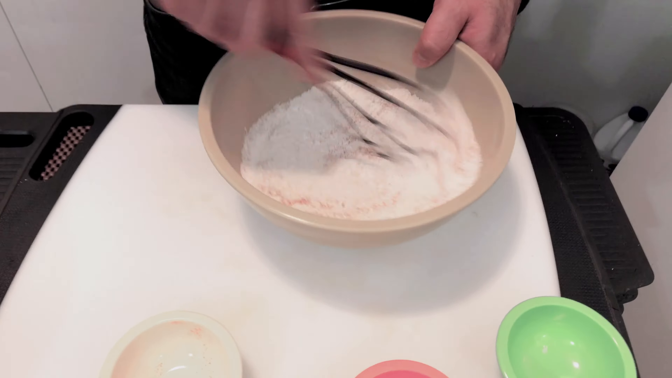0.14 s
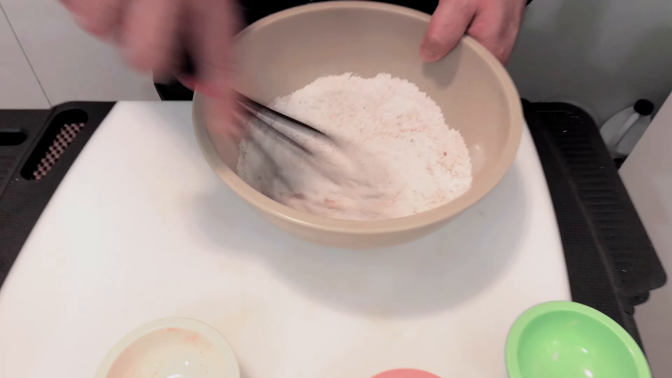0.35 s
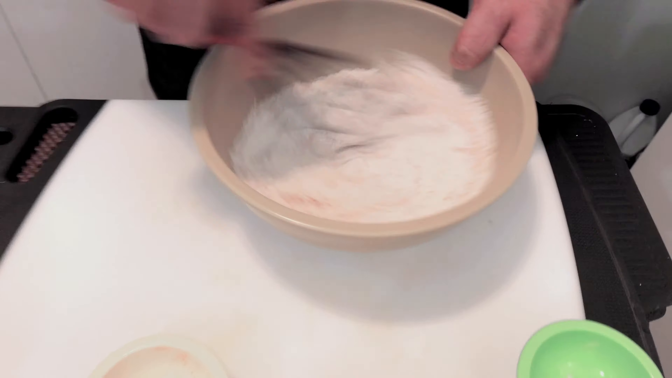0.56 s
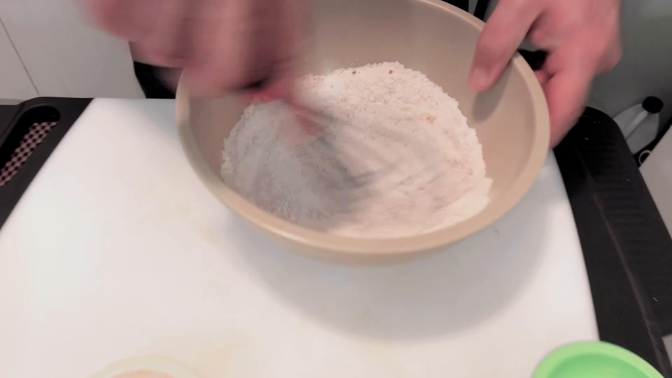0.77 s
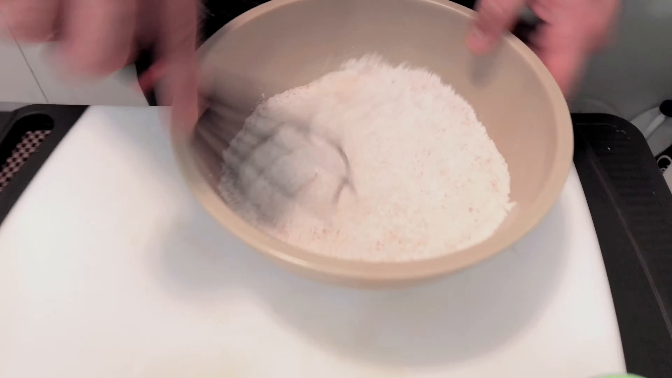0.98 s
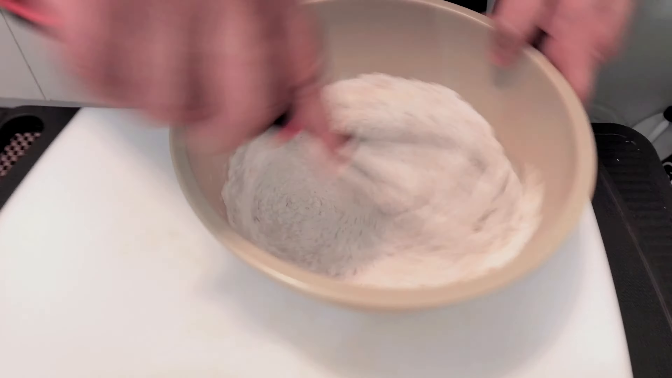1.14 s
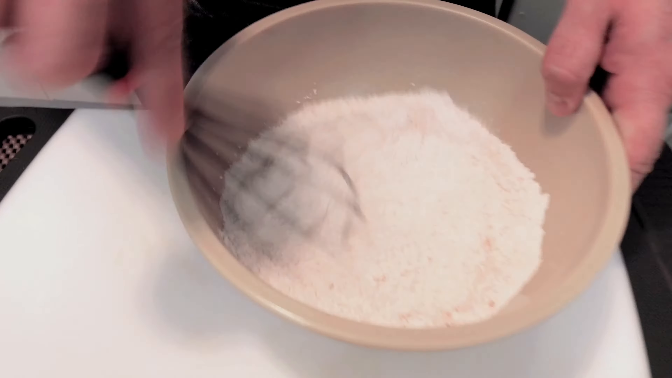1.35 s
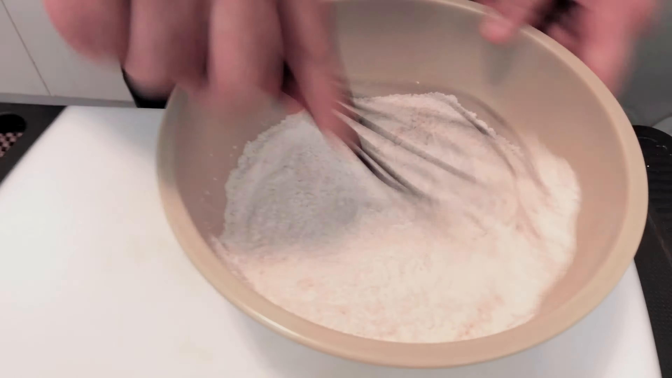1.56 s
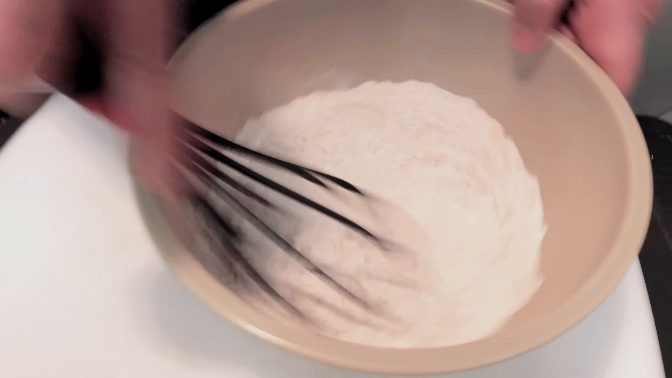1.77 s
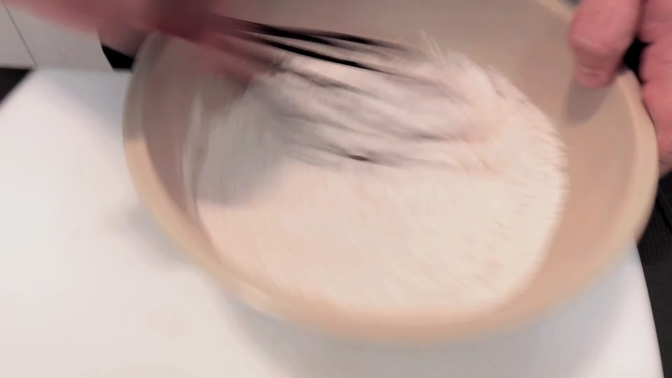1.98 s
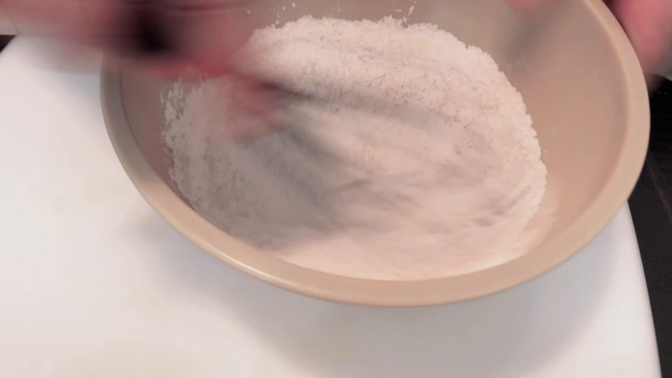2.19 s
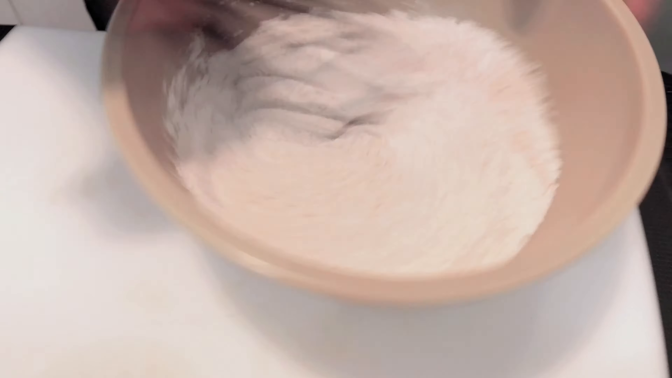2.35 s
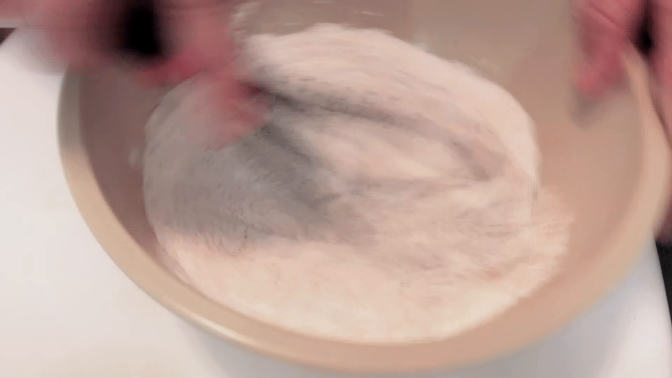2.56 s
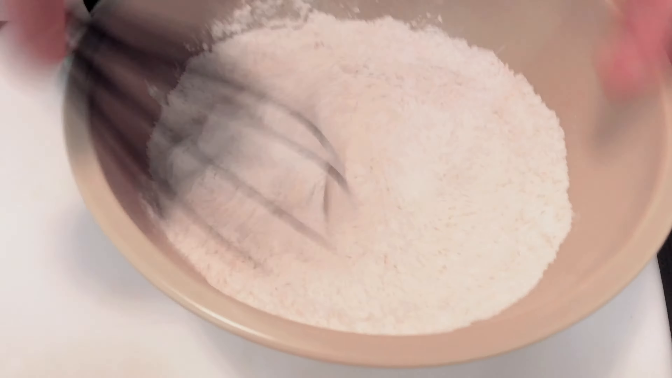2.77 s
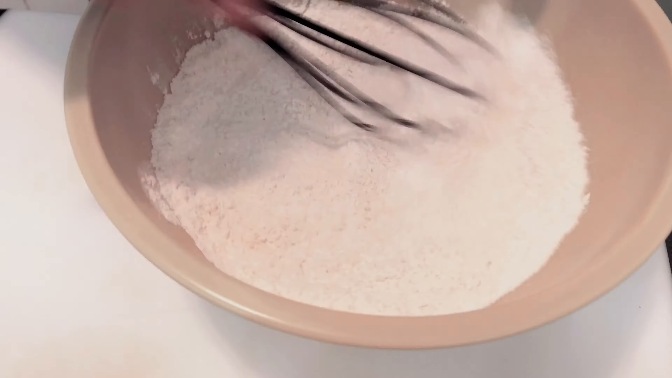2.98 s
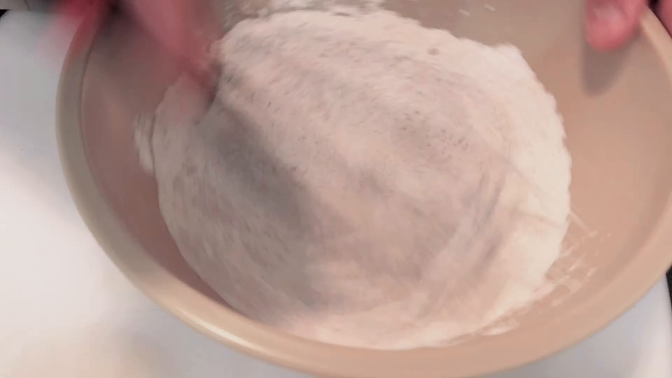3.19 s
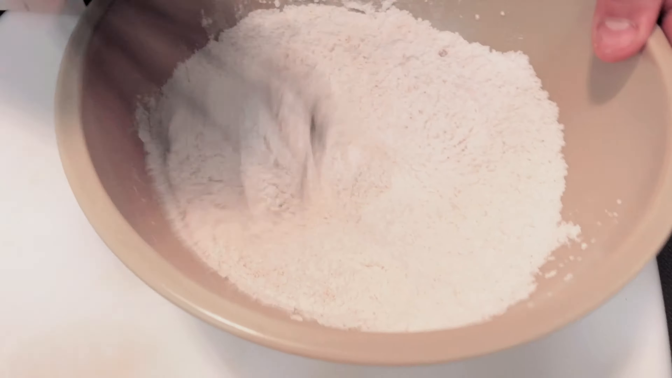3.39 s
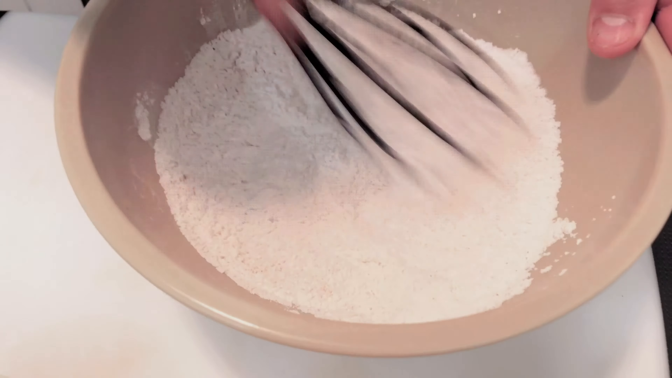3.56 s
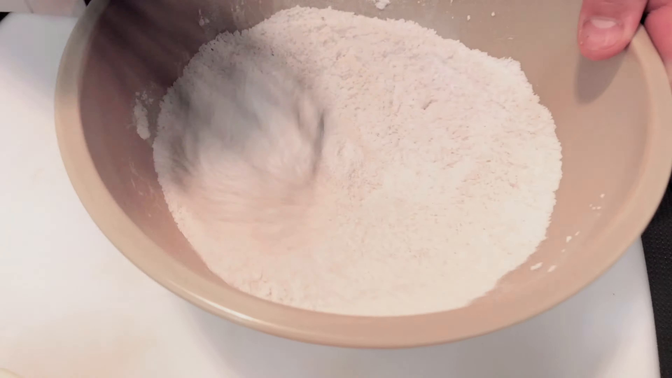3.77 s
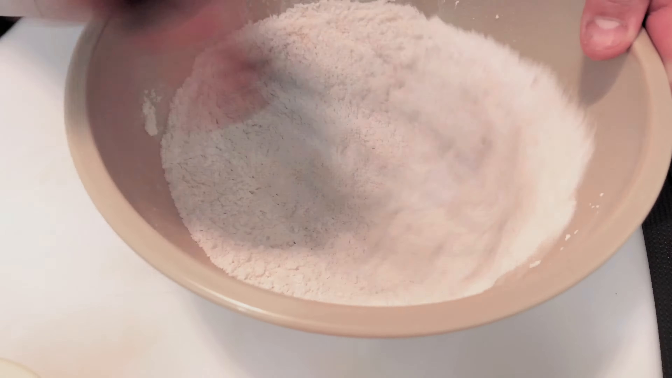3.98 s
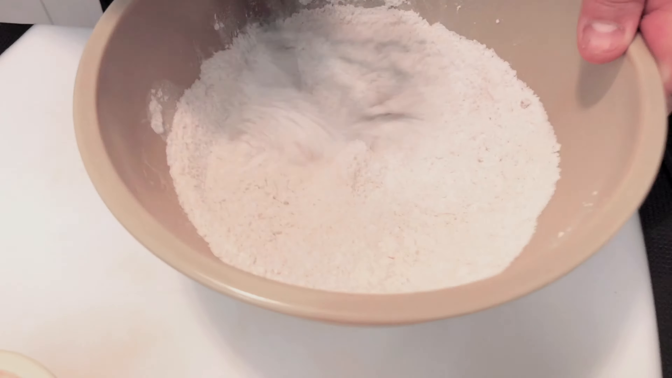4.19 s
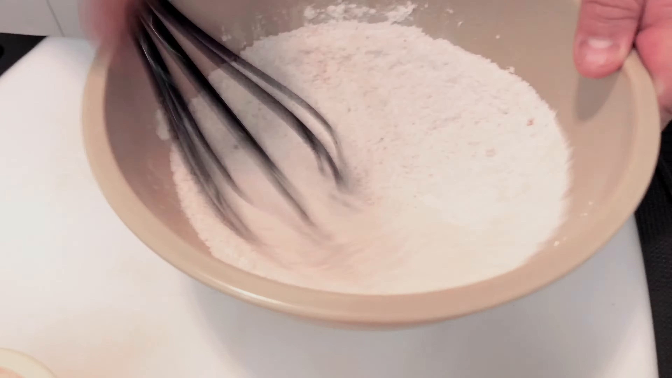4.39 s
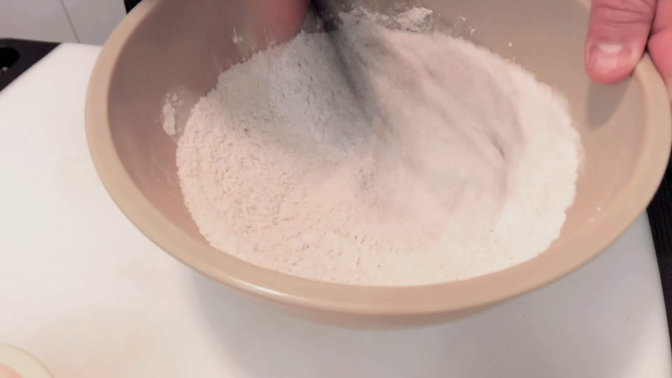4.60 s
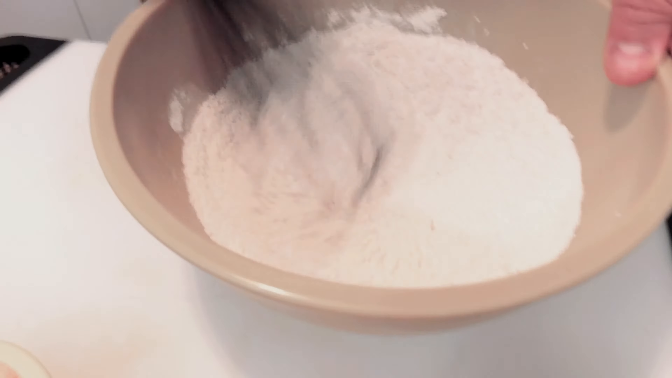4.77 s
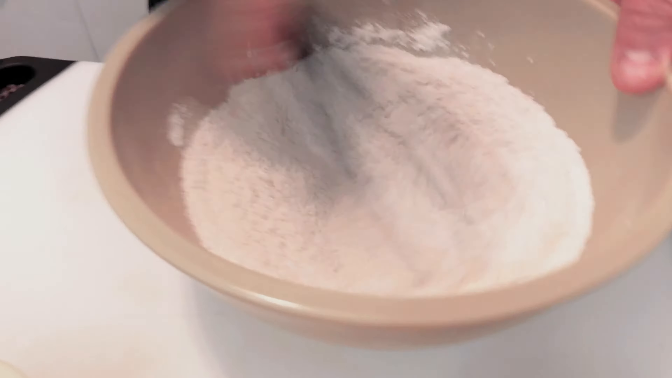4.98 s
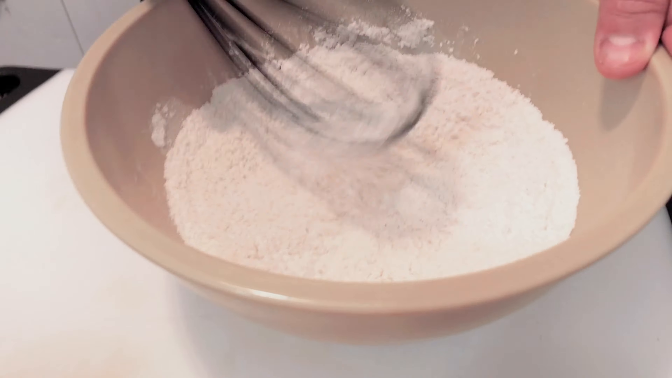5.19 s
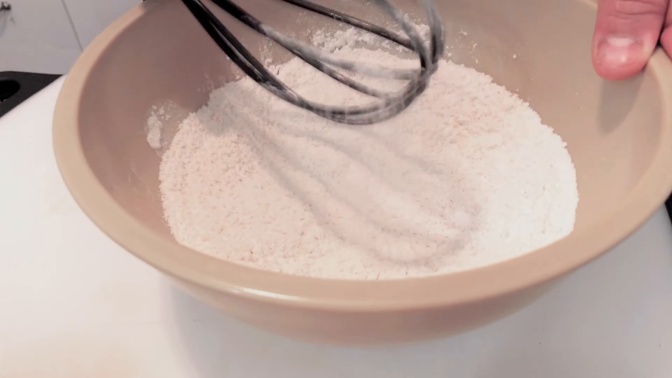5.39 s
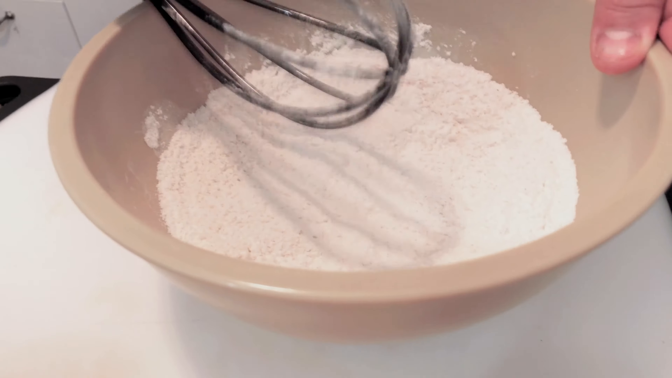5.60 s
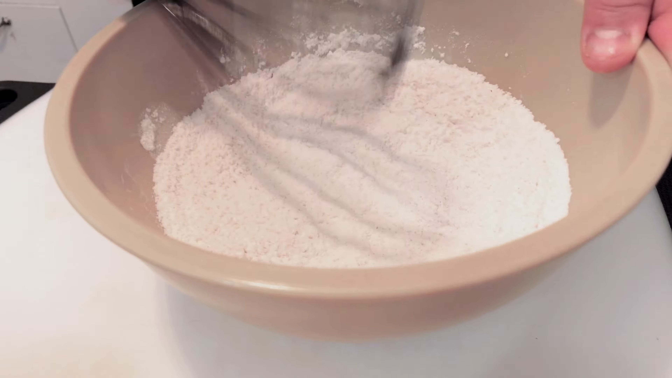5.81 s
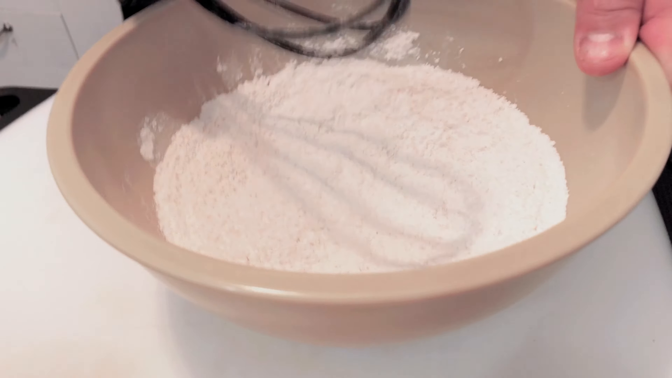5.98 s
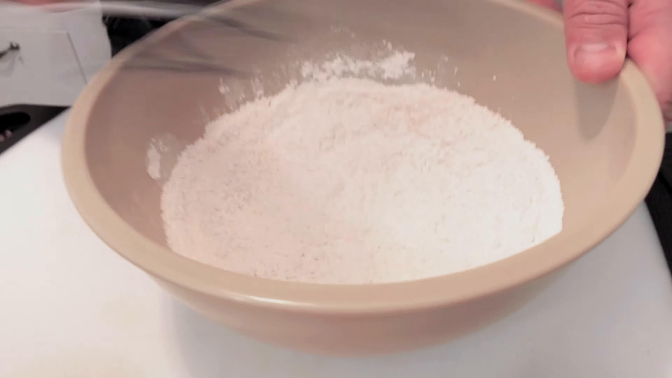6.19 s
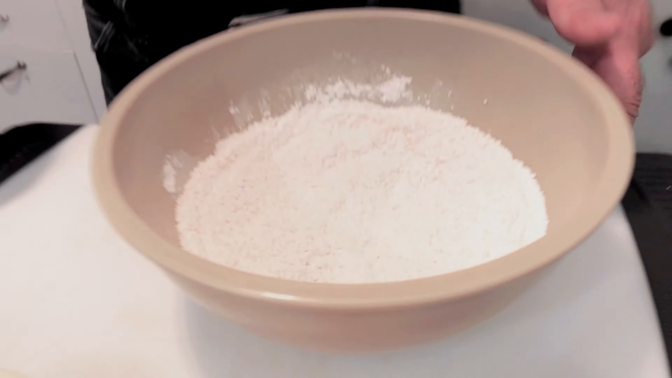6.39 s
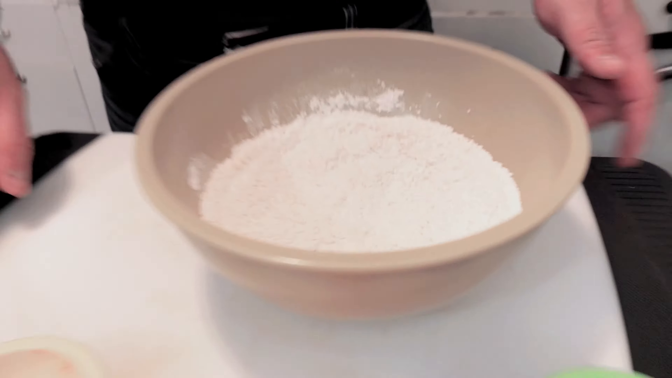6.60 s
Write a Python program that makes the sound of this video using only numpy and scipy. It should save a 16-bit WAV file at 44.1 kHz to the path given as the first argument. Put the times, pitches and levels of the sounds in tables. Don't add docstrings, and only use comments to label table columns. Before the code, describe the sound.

A wire whisk stirs flour in a plastic bowl with quick scratchy swishes, then taps the rim five times and is set down with a knock.

```python
import sys
import numpy as np
from scipy import signal
from scipy.fft import rfft, irfft, next_fast_len
from scipy.io import wavfile
from scipy.ndimage import uniform_filter1d, map_coordinates

SR = 44100
rng = np.random.default_rng(int(sys.argv[2]) if len(sys.argv) > 2 else 0)


def rack_gain(trim_db):
    fader = np.asarray(trim_db, float)
    return 10 ** (fader / 20)


def output_pcm(signal):
    pcm = np.clip(np.atleast_2d(signal).T, -1, 1) * 32767
    wavfile.write(sys.argv[1], SR, np.round(pcm).astype(np.int16))


N = 293265


def unit(x):
    return x / np.sqrt(np.mean(x ** 2) + 1e-20)


def along(points, hz):
    f, v = np.transpose(points)
    return np.interp(np.log(hz + 1), np.log(f + 1), v)


def wobble(rate):
    knots = rng.standard_normal(int(N * rate / SR) + 4)
    return map_coordinates(knots, [np.arange(N) * rate / SR], order=1)


def filtered(x, response):
    m = next_fast_len(N + SR // 2)
    return irfft(rfft(x, m) * response(np.fft.rfftfreq(m, 1 / SR)), m)[..., :N]


def resonance(f, hz, width):
    return 1j * f * width / (hz * hz - f * f + 1j * f * width)


def coloured(x, spectrum):
    return unit(filtered(x, lambda f: rack_gain(along(spectrum, f))))


def dull(t, lo_hz, hi_hz):
    band = signal.butter(2, [lo_hz, hi_hz], "band", fs=SR, output="sos")
    return unit(signal.sosfilt(band, rng.standard_normal(len(t))))


def ringing(modes, t, scatter_db):
    out = 0
    for hz, db, t60 in modes:
        level = db + rng.normal(0, scatter_db)
        out = out + rack_gain(level - 60 * t / t60) * np.sin(2 * np.pi * hz * t)
    return out


def add(track, s, sound):
    part = track[round(s * SR):][:len(sound)]
    part += sound[:len(part)]


def swells(rows):
    t, power = np.arange(N) / SR, np.full(N, 1e-12)
    for s, db, rise, fall in rows:
        near = slice(max(round((s - 4 * rise) * SR), 0), round((s + 4 * fall) * SR))
        width = np.where(t[near] < s, rise, fall)
        power[near] += rack_gain(2 * db) * np.exp(-((t[near] - s) / width) ** 2)
    return power


# (frequency [Hz], level [dB])
AIR_SPECTRUM = [(15, -26), (25, 4), (124, -10), (163, -17), (238, -16), (902, -28), (1060, -26),
                (10400, -36), (15700, -38), (15900, -80)]


def room_air():
    air_db = -57.5
    return rack_gain(air_db) * coloured(rng.standard_normal(N), AIR_SPECTRUM)


# (frequency [Hz], t60 [s])
KITCHEN_T60 = [(200, 0.94), (2000, 0.42), (10000, 0.21)]


def kitchen(x):
    hz, t, z = signal.stft(rng.standard_normal(SR // 2), SR, nperseg=256)
    decay = rack_gain(-60 * t / along(KITCHEN_T60, hz)[:, None])
    tail = signal.istft(z * decay, SR, nperseg=256)[1]
    return signal.fftconvolve(np.pad(x, (200, 0)), tail / np.linalg.norm(tail))[:N]


# (frequency [Hz], level [dB])
ROCK_SPECTRUM = [(41, -28), (70, 7.5), (134, 0.5), (265, 3), (329, -1), (357, -18.5), (500, -27.5),
                 (650, -48), (1100, -120)]
# (time [s], level [dB])
HAND_JOLTS = [(0.172, -51), (0.918, -49), (1.127, -48), (1.247, -48), (1.731, -43.5), (1.861, -33.5),
              (2.128, -46.5), (2.287, -43.5), (2.434, -42.5), (2.534, -39), (3.046, -43), (3.639, -47.5),
              (4.031, -43.5), (4.343, -47.5)]
# (time [s], peak level [dB], pitch [Hz])
BOWL_KNOCKS = [(0.272, -41, 1000), (2.095, -36, 241), (.9, -41, 101), (1.0, -44, 150), (1.42, -37, 200),
               (2.397, -33.5, 333), (3.989, -37, 130), (4.128, -43, 132), (4.485, -39, 130),
               (4.815, -38.5, 127), (5.714, -33, 200), (5.902, -29, 200), (6.121, -33, 210),
               (2.791, -39, 202), (0.523, -29.5, 282), (0.885, -23.5, 1200), (1.075, -37, 154),
               (1.216, -35, 263), (1.387, -35.5, 242), (1.594, -34.5, 97), (1.705, -32.5, 1300),
               (1.812, -30, 150), (1.935, -28.5, 278), (2.243, -22.5, 975), (2.496, -28, 78),
               (2.658, -27.5, 180), (3.24, -24, 229), (3.895, -36, 1200), (3.985, -28.5, 640),
               (4.277, -38, 222), (4.53, -32, 148), (4.806, -38, 1270), (5.317, -30.5, 243),
               (5.714, -34.5, 87), (5.902, -22.5, 79.5), (6.122, -27.5, 80.7), (5.902, -27, 654),
               (6.121, -37, 690)]


def worktop():
    boom_db, rock_db, rock_knock_db, rock_t60 = -59, -62.5, -15, 0.19
    jolt_s, jolt_hz = 0.029, 46.6
    knock_cycles = 8.9
    stirring = uniform_filter1d(1. * (np.arange(N) < STROKES[-1][1] * SR), size=4000)
    boom = unit(filtered(rng.standard_normal(N), lambda f: resonance(f, 45, 24) ** 2))
    jolts = np.sqrt(2 * swells([(s, db, 0.63 * jolt_s, jolt_s) for s, db in HAND_JOLTS]))
    jolt_phase = 2 * np.pi * np.cumsum(jolt_hz + 3.24 * wobble(8)) / SR
    out = rack_gain(boom_db) * stirring * boom + jolts * np.sin(jolt_phase)
    sway = rack_gain(rock_db) * stirring
    rock = coloured(rng.standard_normal(N) * rack_gain(np.clip(3 * wobble(40), -6, 4)), ROCK_SPECTRUM)
    t = np.arange(SR // 4) / SR
    plate = [(180, -11.5, .04), (270, -10.5, .05), (370, -13, .03), (720, -10, .02), (1100, -12, .02)]
    for s, db, hz in BOWL_KNOCKS:
        thud = ringing([(hz, 0, max(knock_cycles / hz, .018))] + plate, t, scatter_db=2.0)
        thud = thud + rack_gain(-17.5 - 60 * t / 0.096) * dull(t, 110, 600)
        add(out, s + 0.00142, rack_gain(db - 2.0) * (1 - np.exp(-t / 0.0016)) * thud)
        add(sway, s, rack_gain(db + rock_knock_db - 60 * t / rock_t60))
    return out + sway * rock


def clash(hz, broad, t60, top_hz):
    t = np.arange(SR // 20) / SR
    f = np.fft.rfftfreq(len(t), 1 / SR)
    colour = (broad + resonance(f, hz, 0.18 * hz)) * resonance(f, 6100, 15000)
    colour = colour / (1 + (f / top_hz) ** 3) / (1 + (900 / (f + 1)) ** 2)
    noise = irfft(rfft(rng.standard_normal(len(t))) * colour, len(t))
    burst = noise * (1 - np.exp(-t / 0.00029)) * rack_gain(-60 * t / t60)
    return burst / np.abs(burst).max()


# (start [s], end [s], from [Hz], to [Hz], level [dB])
SLIDE_WHISTLES = [(6.38, 6.422, 10820, 11400, -71), (6.43, 6.5, 12000, 12250, -70),
                  (6.46, 6.5, 11100, 11350, -71), (6.545, 6.592, 11950, 11850, -66),
                  (6.508, 6.535, 12000, 12100, -71), (6.53, 6.6, 13800, 13400, -76),
                  (6.599, 6.605, 14500, 14500, -51)]
# (time [s], peak level [dB], pitch [Hz], board level re tip [dB])
TIP_TICKS = [(5.519, -27.5, 4720, -29), (5.52, -31, 2400, -29), (5.883, -38, 2700, -29),
             (6.11, -27.5, 3000, -24), (6.429, -24.5, 3350, -13), (6.504, -25, 2830, -12),
             (6.648, -34, 4500, -14)]
# (frequency [Hz], level [dB], t60 [s])
BOARD_MODES = [(261, -4, 0.1), (422, -11.5, 0.025), (690, -4.5, 0.06), (923, -12, 0.029), (1410, -1, .04),
               (1890, -17, 0.034)]
# (frequency [Hz], level [dB], t60 [s])
WORKTOP_MODES = [(48.1, -1, 0.26), (89.5, -7.5, 0.12), (255.5, -12, 0.081), (173, -16, 0.084)]
# (frequency [Hz], level [dB], t60 [s])
HANDLE_MODES = [(500, -7, .02), (716, 3.5, 0.021), (890, 0.5, 0.02), (1020, -6, 0.017), (1200, -2.5, 0.019),
                (1340, -8, .018), (1540, -11, 0.02), (1900, -13, .016), (2530, -11, .008)]
# (time [s], peak level [dB])
LAID_DOWN = [
    (6.594, -8),
]


def laid_down():
    out, t = np.zeros(N), np.arange(SR // 8) / SR
    for t0, t1, hz0, hz1, db in SLIDE_WHISTLES:
        u = np.linspace(0, 1, round((t1 - t0) * SR))
        jitter = 900 * uniform_filter1d(rng.standard_normal(len(u)), size=60)
        phase = 2 * np.pi * np.cumsum(hz0 + (hz1 - hz0) * u + jitter) / SR
        add(out, t0, rack_gain(db) * np.sqrt(np.sin(np.pi * u) + 1e-9) * np.sin(phase))
    for s, db, hz, board_db in TIP_TICKS:
        add(out, s, rack_gain(db - 1.5) * clash(hz, broad=0.32, t60=0.0083, top_hz=1.8 * hz))
        add(out, s, rack_gain(db + board_db) * ringing(BOARD_MODES, t, scatter_db=1.5))
        add(out, s, rack_gain(db + board_db - 18.0 - 60 * t / 0.63) * dull(t, 200, 5000))
    s, db = LAID_DOWN[0]
    thump = ringing(WORKTOP_MODES[:2] + [(266.6, 18.2, 0.069)], t, scatter_db=2.5)
    add(out, s + 0.0038, rack_gain(db - 19.5) * (1 - np.exp(-t / 0.0033)) * thump)
    add(out, s + 0.0018, rack_gain(db - 23) * clash(2400, broad=0.33, t60=0.012, top_hz=9000))
    bounces = [(.0025, -16.5), (.0036, -3.5), (.0069, -6.5), (.0125, -12), (.03, -21), (.041, -21)]  # (s, dB)
    for lag, bounce_db in bounces:
        knock = ringing(HANDLE_MODES, t, scatter_db=3.5)
        add(out, s + lag, rack_gain(db + bounce_db) * (1 - np.exp(-t / 0.0004)) * knock)
    decay = rack_gain(-60 * t / 0.016) + 0.32 * rack_gain(-60 * t / 0.23)
    add(out, s + 0.0027, rack_gain(db - 16.5) * dull(t, 400, 1720) * decay)
    return out


# (frequency [Hz], t60 [s])
WIRE_MODES = [(2370, 0.0098), (3945, .07), (4145, .04), (4780, 0.016), (5590, .009), (6300, 0.0089),
              (9275, .009), (10885, .007), (13200, .006)]


def strike(levels_db, rattle):
    t = np.arange(SR // 12) / SR
    out = np.zeros(2 * len(t))
    for lag in (np.arange(4) + rng.random(4)) * rattle / 4:
        modes = [(hz * rng.normal(1, .008), db, t60) for (hz, t60), db in zip(WIRE_MODES, levels_db)]
        add(out, lag, ringing(modes, t, scatter_db=2.5))
    return out / np.abs(out).max()


# (time [s], peak level [dB], crack centre [Hz], worktop level [dB], shiver re peak [dB])
RIM_TAPS = [(5.271, -6, 5590, -20.5, -38.5), (5.475, -9, 5100, -23.5, -33.5),
            (5.653, -7.5, 10900, -20.5, -34), (5.846, -3.5, 3950, -18, -35), (6.06, -3, 8700, -20, -37.5)]
# (frequency [Hz], width [Hz], level [dB])
SHIVER_MODES = [
    [(4630, 600, 8), (1600, 150, -7), (5900, 900, 8), (11500, 1500, -6)],
    [(2370, 450, -11), (3950, 200, -11), (4790, 500, 2), (6000, 640, -3.5), (12000, 2000, -15.5)],
    [(2300, 400, -10), (4170, 480, 4.5), (6630, 280, -3.5), (8950, 350, -4), (9600, 220, -3)],
    [(1640, 150, -14), (3960, 200, 0.5), (4750, 250, -9), (9100, 350, -9), (10900, 300, -19.5)],
    [(3980, 170, 2), (8800, 600, -3.5), (11400, 407, -18.5)],
]
STRIKE_LEVELS = [(-11, -30, -30, -19, 0.5, -1.5, -12.5, -9, 0), (-8, -22, -27, -7, -6, -1, -8, -1, 2),
                 (-3.5, -18, -17.5, -16, -16, -3.5, -3, 3, -3.5),
                 (-12.5, -11.5, -20, -11, -12.5, -10.5, 3.5, 1.5, -9),
                 (-15, -14, -21, -20, -16, -9, 6.5, -12, -5)]
RATTLE_TIMES = [.0025, .001, .0025, .002, .0022]
# (frequency [Hz], level [dB])
SIFT_SPECTRUM = [(350, -52.5), (600, -16), (1630, -6), (2800, -20), (4070, -0.5), (7280, -15), (9340, -12),
                 (15000, -25), (15800, -25.5), (16500, -43.5)]


def taps():
    sift_db = -34
    out, sift, t = np.zeros(N), np.zeros(N), np.arange(SR // 3) / SR
    f = np.fft.rfftfreq(len(t), 1 / SR)
    shiver_decay = rack_gain(-60 * t / 0.34) + 2.9 * rack_gain(-60 * t / 0.022)
    for tap, wires, struck_db, rattle in zip(RIM_TAPS, SHIVER_MODES, STRIKE_LEVELS, RATTLE_TIMES):
        s, db, hz, top_db, shiver_db = tap
        add(out, s, rack_gain(db - 4) * clash(hz, broad=0.96, t60=0.01 + rattle, top_hz=15000))
        add(out, s + .0004, rack_gain(db - 2.0) * strike(struck_db, rattle))
        narrow = sum(rack_gain(level) * resonance(f, c, w * (1 + c / 7000)) ** 2 for c, w, level in wires)
        colour = narrow + 0.15 * resonance(f, hz, .5 * hz)
        flutter = rack_gain(3.6 * np.repeat(rng.standard_normal(len(t) // 150 + 1), 150)[:len(t)])
        shiver = flutter * irfft(rfft(rng.standard_normal(len(t))) * colour, len(t))
        add(out, s, unit(shiver) * rack_gain(db + shiver_db) * shiver_decay)
        boom = ringing(WORKTOP_MODES, t, scatter_db=0.3)
        add(out, s + 0.0077, rack_gain(top_db + 0.3) * (1 - np.exp(-t / 0.0062)) * boom)
        add(out, s + 0.00363, rack_gain(top_db - 16.5 - 60 * t / 0.24) * dull(t, 90, 300))
        add(sift, s, rack_gain(db + sift_db - 60 * t / 0.24))
    return out + sift * coloured(grains(spread_db=0.5, clump_db=2.0), SIFT_SPECTRUM)


# (time [s], peak level [dB], the wire's note [Hz])
WIRE_CATCHES = [(0.1528, -24.5, 4030), (0.1724, -14.5, 8600), (0.2134, -21, 5280), (0.522, -25, 3900),
                (0.6619, -29, 2930), (0.8848, -15.5, 8500), (1.222, -21, 5820), (1.597, -14.5, 7700),
                (1.6237, -12.5, 7720), (1.7255, -12.5, 4460), (1.937, -15.5, 4000), (2.0656, -8.5, 5470),
                (2.0727, -13, 4000), (2.2428, -13, 3610), (2.396, -6.5, 4300), (2.458, -15.5, 4100),
                (2.664, -18, 4050), (2.798, -16, 3660), (3.016, -15.5, 4050), (3.0521, -13, 4580),
                (3.1996, -31, 8300), (3.2134, -42.5, 6300), (3.24, -24.5, 9070), (3.8664, -21, 4460),
                (3.8978, -10.5, 4420), (3.9855, -8.5, 3650), (4.333, -20, 4330), (4.441, -12, 4680),
                (4.5347, -21, 6630), (4.676, -21, 3540), (4.8364, -10.5, 6370), (0.9996, -26, 8590),
                (1.6198, -17.5, 5560), (3.895, -16, 8600), (3.999, -15, 3700), (4.478, -11.5, 2410)]
# (time [s], peak level [dB], pitch [Hz], length [s])
WALL_CLACKS = [
    (3.2398, -22.5, 1080, 0.0049),
    (3.2472, -29, 1060, 0.0044),
    (3.9875, -24, 1860, 0.0053),
]


def catches():
    out, t = np.zeros(N), np.arange(SR // 20) / SR
    f = np.fft.rfftfreq(len(t), 1 / SR)
    spectrum = [(300, -55), (1000, -10), (2500, -8.5), (4000, -0.5), (5200, -2.0), (10300, -2)]
    colour = rack_gain(along(spectrum + GRIT_SPECTRUM[9:], f))
    tail = rack_gain(-60 * t / 0.026)
    for s, db, hz in WIRE_CATCHES:
        note = 1 + 1.3 * resonance(f, hz, 0.11 * hz)
        noise = irfft(rfft(rng.standard_normal(len(t))) * colour * note, len(t))
        snap = unit(noise) * (rack_gain(-60 * t / 0.012) + 0.32 * tail)
        snap = snap + 0.78 * tail * np.sin(2 * np.pi * hz * t)
        snap = snap * (1 - np.exp(-t / 0.0004))
        add(out, s, rack_gain(db - 2.5) * snap / np.abs(snap).max())
    for s, db, hz, length in WALL_CLACKS:
        swell = np.sin(np.pi * np.minimum(t / length, 1))
        add(out, s, rack_gain(db) * swell * np.sin(2 * np.pi * hz * t))
    return out


def grains(spread_db, clump_db, tick=0):
    flicks_per_s, flick_s = 90, 0.0014
    luck = rng.exponential(size=N)
    largest = np.maximum(luck - np.log(SR / flicks_per_s), 0)
    flicks = signal.lfilter([1], [1, -np.exp(-1 / (flick_s * SR))], largest)
    size = rack_gain(spread_db * luck) * (1 + tick * flicks)
    clumps = 0.72 * wobble(500) + 0.91 * wobble(110) + 0.1 * wobble(30)
    return unit(rng.standard_normal(N) * size * rack_gain(clump_db * clumps))


def patchy(x, patch_db, shape_db=0):
    z = signal.stft(x, nperseg=256)[2]
    field = uniform_filter1d(rng.standard_normal(z.shape), size=5, axis=0)
    field = uniform_filter1d(field, size=6, axis=1)
    streaks = uniform_filter1d(rng.standard_normal(z.shape), size=10, axis=1)
    patches = unit(unit(field) + 0.95 * unit(streaks))
    return signal.istft(z * rack_gain(patch_db * patches + shape_db), nperseg=256)[1][:N]


# (landing [s], lifting [s], steady scrape level [dB])
STROKES = [(0.0, 0.104, -40), (0.153, 0.231, -42.5), (0.242, 0.497, -41), (0.52, 0.596, -33.5),
           (0.662, 0.846, -40.5), (0.885, 0.977, -37.5), (0.995, 1.167, -35.5), (1.217, 1.555, -37.5),
           (1.594, 1.897, -36), (1.939, 2.191, -36.5), (2.204, 2.394, -39), (2.408, 2.598, -40.5),
           (2.598, 2.959, -34), (2.97, 3.047, -32.5), (3.245, 3.272, -41), (3.289, 3.621, -41),
           (3.632, 3.918, -33.5), (3.962, 4.661, -36.5), (4.678, 5.062, -43.5)]
# (time [s], scrape level [dB], rise [s], fall [s])
WRIST_PUSHES = [(0.216, -35, 0.1, 0.003), (0.264, -37, 0.011, 0.076), (0.474, -34.5, 0.032, 0.0079),
                (0.538, -32.5, 0.005, 0.078), (0.799, -39.5, 0.12, 0.014), (0.874, -29, 0.004, 0.058),
                (1.06, -36, 0.03, 0.019), (1.264, -29, 0.017, 0.011), (1.28, -26, 0.004, 0.0038),
                (1.313, -33.5, 0.065, 0.14), (1.394, -33, 0.04, 0.006), (1.606, -30, 0.014, 0.034),
                (1.737, -28.4, 0.036, 0.013), (1.815, -31, 0.026, 0.065), (1.975, -28.5, 0.024, 0.028),
                (2.196, -31, 0.056, 0.017), (2.313, -28, 0.034, 0.04), (2.499, -32.5, 0.043, 0.058),
                (2.616, -29, 0.0052, 0.015), (2.701, -26, 0.005, 0.0084), (2.715, -32, 0.067, 0.0045),
                (2.924, -34.5, 0.037, 0.035), (3.022, -32.5, 0.02, 0.075), (3.338, -29.5, 0.023, 0.18),
                (3.341, -27.5, 0.0098, 0.018), (3.502, -34, 0.0056, 0.064), (3.563, -33.5, 0.01, 0.003),
                (3.728, -31, 0.0048, 0.024), (3.842, -29.5, 0.077, 0.027), (3.999, -32, 0.019, 0.081),
                (4.124, -34, 0.013, 0.056), (4.134, -28, 0.013, 0.008), (4.272, -29.5, 0.0061, 0.011),
                (4.335, -32.5, 0.006, 0.051), (4.454, -28, 0.009, 0.01), (4.459, -36, 0.018, 0.19),
                (4.477, -31, 0.024, 0.012), (4.485, -25, 0.0084, 0.0047), (4.553, -29, 0.009, 0.007),
                (4.68, -32, 0.0072, 0.037), (4.849, -28, 0.043, 0.0056), (4.868, -36, 0.074, 0.058),
                (5.0, -32, 0.02, 0.042)]
# (time [s], wall level [dB], rise [s], fall [s])
WALL_RUBS = [(0.217, -43, 0.019, 0.013), (0.263, -45.5, 0.015, 0.06), (0.587, -41, 0.051, 0.062),
             (0.978, -42, 0.043, 0.026), (1.312, -40.5, 0.016, 0.071), (1.678, -40.5, 0.024, 0.011),
             (1.705, -40, 0.006, 0.009), (2.017, -39.5, 0.017, 0.062), (2.24, -38.5, 0.0026, 0.019),
             (2.331, -40.5, 0.003, 0.071), (2.495, -46, 0.01, 0.046), (2.706, -36.5, 0.0072, 0.019),
             (2.724, -42.5, 0.039, 0.09), (3.047, -44, 0.009, 0.0081), (3.246, -40.5, 0.008, 0.009),
             (3.333, -38.5, 0.022, 0.054), (3.595, -42.5, 0.031, 0.0098), (3.721, -42, 0.023, 0.038),
             (3.843, -43, 0.0083, 0.015), (3.905, -37.5, 0.0072, 0.0029), (3.995, -36.5, 0.013, 0.003),
             (4.061, -40.5, 0.028, 0.15), (4.343, -40.5, 0.011, 0.0045), (4.383, -43, 0.015, 0.094),
             (4.795, -45.5, 0.081, 0.044), (4.827, -44.5, 0.009, 0.011), (4.978, -48.5, 0.033, 0.066)]
NEAR_PASSES = [.275, .59, .966, 1.29, 1.67, 2.036, 2.324, 2.723, 3.05, 3.342, 3.714, 4.087, 4.4, 4.77]


def contact():
    lift_db_per_s, land_s = 1100, 0.0014
    trickle_db, trickle_db_per_s = -14.5, 128.5
    wall_db, wall_trickle_db, wall_trickle_db_per_s = -16, -10, 58.5
    t = np.arange(N) / SR
    land, lift, steady_db = np.transpose(STROKES)
    k = np.maximum(np.searchsorted(land, t, "right") - 1, 0)
    off = np.maximum(t - lift[k], 0)
    lifted = rack_gain(-2 * lift_db_per_s * off)
    gate = lifted + rack_gain(2 * (trickle_db - trickle_db_per_s * off))
    wall_gate = lifted + rack_gain(2 * (wall_trickle_db - wall_trickle_db_per_s * off))
    held = np.arange(N) - (off * SR).astype(int)
    press = (rack_gain(2 * steady_db[k]) + swells(WRIST_PUSHES))[held]
    wall = rack_gain(2 * wall_db) * press + swells(WALL_RUBS)[held]
    skipping = (t > 3.79) * (t < 3.895)
    press = press * rack_gain(2 * 3 * np.cos(2 * np.pi * 59 * (t - 3.8485)) * skipping)

    turn_s = 0.35
    times = [NEAR_PASSES[0] - turn_s, *NEAR_PASSES, NEAR_PASSES[-1] + turn_s]
    turn = np.interp(t, times, np.arange(len(times)))
    band_hz = 6000 * np.exp(0.18 * np.cos(2 * np.pi * (turn - 0.3)))
    dust_db = -3 + 1 * np.cos(2 * np.pi * (turn - 0.6))
    ring_db = 1.0 + 1 * np.maximum(np.cos(2 * np.pi * (turn - 0.15)), 0)
    aloft = np.minimum(off / 0.04, 1)
    dust_db, ring_db = dust_db - 6 * aloft, ring_db + 3 * aloft
    keep = np.exp(-1 / (land_s * SR))
    force = np.sqrt([gate * press, wall_gate * wall])
    press, rub = signal.lfilter([1 - keep], [1, -keep], force)
    return press, rub, band_hz, dust_db, ring_db


# (frequency [Hz], width [Hz])
BOWL_MODES = [(1340, 350), (3610, 310), (5340, 440), (5910, 300), (8980, 1660), (11100, 210)]
# (start [s], end [s], from [Hz], to [Hz], level re scrape [dB])
WIRE_DRAGS = [(0.242, 0.29, 3760.0, 3730, 13), (0.237, 0.298, 2320.0, 2300, 15),
              (0.242, 0.345, 1860, 2020, 8.5), (0.242, 0.35, 3050, 2800, 9.5),
              (0.66, 0.732, 2870.0, 2780.0, 8.5), (0.776, 0.856, 2540.0, 2870.0, 10),
              (1.005, 1.099, 2870.0, 2620.0, 11), (1.022, 1.09, 6900, 6950, 7.0),
              (1.33, 1.445, 3920, 2950.0, 8), (1.527, 1.572, 2700.0, 2700.0, 10),
              (1.678, 1.78, 4110.0, 4500.0, 8.5), (2.198, 2.284, 890.0, 963, 17),
              (2.212, 2.281, 2600, 2700.0, 5), (2.22, 2.287, 3550, 3760.0, 11.5),
              (2.398, 2.449, 2310, 2320.0, 9.5), (2.483, 2.56, 2950.0, 3230.0, 8),
              (2.86, 2.942, 3230.0, 3330.0, 9), (3.562, 3.627, 2810, 2780.0, 7.5),
              (3.623, 3.723, 3540.0, 3180, 8), (3.87, 3.921, 1280.0, 1200.0, 10),
              (3.957, 4.01, 1830.0, 1800, 0), (3.96, 4.019, 3540.0, 3450, 9),
              (4.08, 4.156, 1830.0, 1990, 9.5), (4.392, 4.505, 2260.0, 2390.0, 9),
              (4.494, 4.56, 6670, 6640.0, 9.5), (4.666, 4.77, 3330.0, 3230.0, 9.5),
              (4.738, 4.845, 2010, 2210, 8), (4.752, 4.832, 2550, 2620.0, 9),
              (4.78, 4.833, 3300, 3430.0, 10.5), (4.802, 4.86, 3500.0, 5960, 6),
              (4.815, 4.88, 6230, 6450.0, 5), (4.91, 4.98, 2120.0, 2000.0, 8.5),
              (4.926, 5.073, 2700.0, 2870.0, 10), (4.938, 5.037, 3300, 3600, 9.5)]
# (frequency [Hz], level [dB])
GRIT_SPECTRUM = [(1530, -19.5), (2600, -13.5), (3250, -6.5), (3600, -4), (4040, 1.5), (4900, -2),
                 (5340, -3), (8550, -2), (10300, -7.5), (12300, -3.5), (15800, -10), (16100, -33),
                 (16500, -46)]
# (frequency [Hz], level [dB])
WALL_SPECTRUM = [(210, -38), (350, -15), (516, -16.5), (908, -5), (1050, -9.5), (1350, -0.5), (1580, -5.5),
                 (2630, -8.5), (3200, -15.5), (4160, -19), (7040, -120)]


def scrape():
    press, rub, band_hz, dust_db, ring_db = contact()
    hz = np.fft.rfftfreq(256, 1 / SR)[:, None]
    frame = np.minimum(np.arange(-(-N // 128) + 1) * 128, N - 1)
    shape_db = 3 * np.exp(-(np.log((hz + 1) / band_hz[frame]) / 0.5) ** 2)
    shape_db = shape_db + (dust_db[frame] + 6) * np.clip((hz - 7500) / 3000, 0, 1)
    shape_db = shape_db + ring_db[frame] * np.exp(-((hz - 4050) / 210) ** 2)
    for centre, width in BOWL_MODES:
        drift = centre * (1 + 0.026 * wobble(9)[frame])
        peak_db = 2.34 + 2.2 * wobble(22.33)[frame]
        shape_db = shape_db + peak_db * np.exp(-((hz - drift) / (width + 150)) ** 2)
    drag_db = 0
    for t0, t1, hz0, hz1, db in WIRE_DRAGS:
        u = np.clip((frame / SR - t0) / (t1 - t0), 0, 1)
        swell_db = 1.24 * db * np.sqrt(np.abs(np.sin(np.pi * u)))
        octave = np.log((hz + 1) / (hz0 + (hz1 - hz0) * u))
        drag_db = drag_db + swell_db * np.exp(-(octave / 0.1) ** 2)
    shape_db = shape_db + drag_db
    middle = rack_gain(2 * shape_db[(hz[:, 0] > 3000) & (hz[:, 0] < 11000)]).mean(axis=0)
    shape_db = shape_db - 10 * np.log10(middle)
    grit = grains(spread_db=0.76, clump_db=1.76, tick=0.4)
    hiss = coloured(patchy(grit, patch_db=3.5, shape_db=shape_db), GRIT_SPECTRUM)
    wall_db = drag_db + 2.2 * np.exp(-((hz - 1340) / 130) ** 2)
    rubbing = grains(spread_db=1.5, clump_db=1.5, tick=0.6)
    wall = coloured(patchy(rubbing, patch_db=3.0, shape_db=wall_db), WALL_SPECTRUM)
    return press * hiss + rack_gain(1.38) * rub * wall


def scene():
    stir, rim, down = scrape() + catches(), taps(), laid_down()
    room = rack_gain(-16) * kitchen(stir + rack_gain(-2.5) * rim + down)
    return (stir + rim + down + room + worktop() + room_air())[None]


def top_cut(x):
    return signal.sosfilt(signal.butter(12, 17040, fs=SR, output="sos"), x)


def record(dry):
    mix = filtered(dry, lambda f: 1 / (1 + (f / 16150) ** 48))
    return top_cut(mix)


dry = scene()
out = record(dry)
output_pcm(out)
```